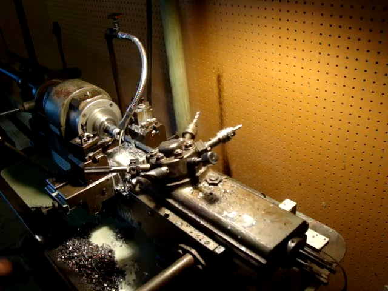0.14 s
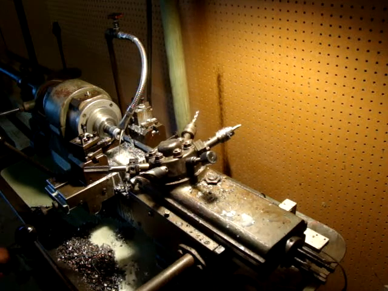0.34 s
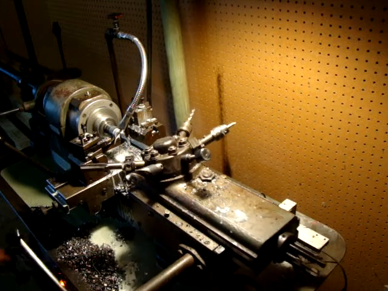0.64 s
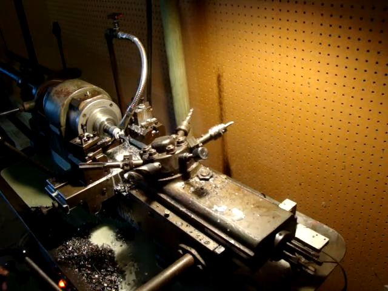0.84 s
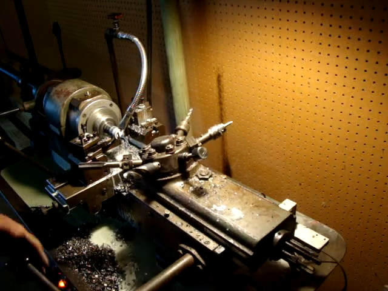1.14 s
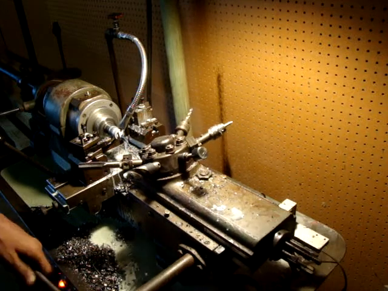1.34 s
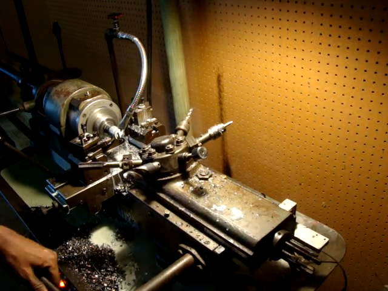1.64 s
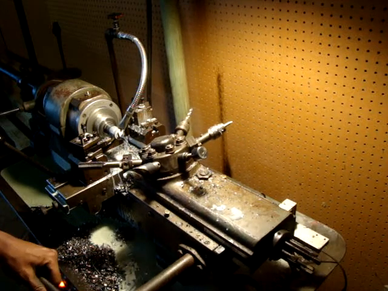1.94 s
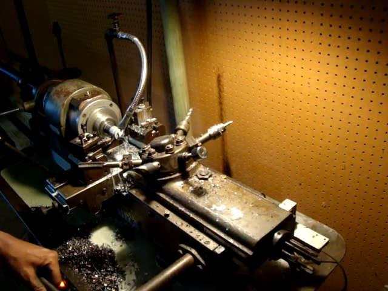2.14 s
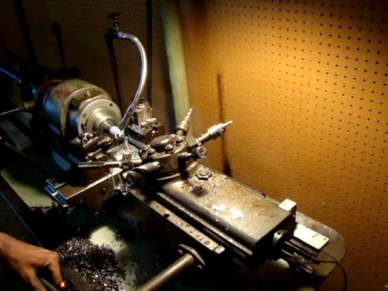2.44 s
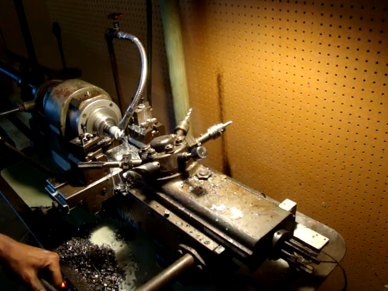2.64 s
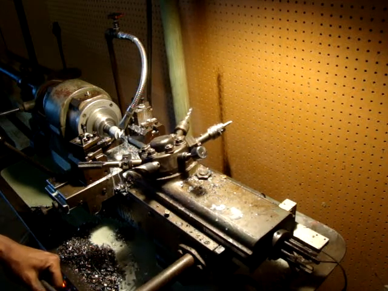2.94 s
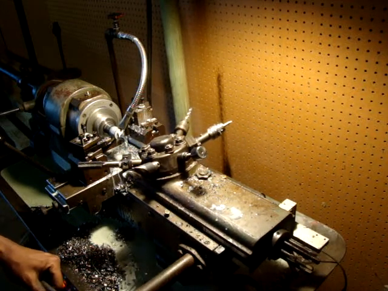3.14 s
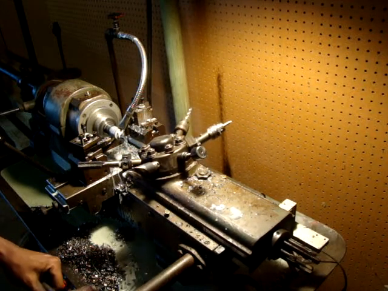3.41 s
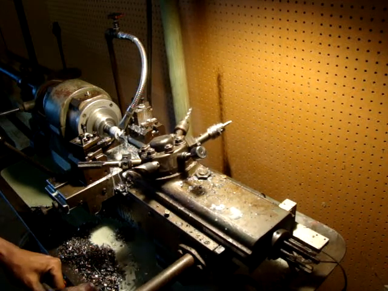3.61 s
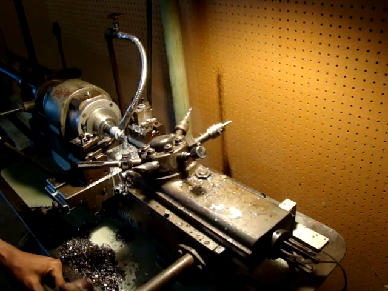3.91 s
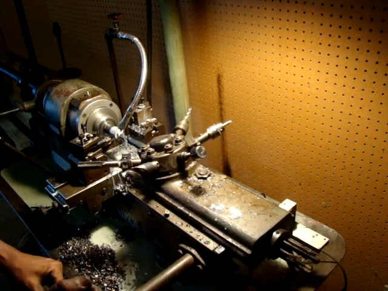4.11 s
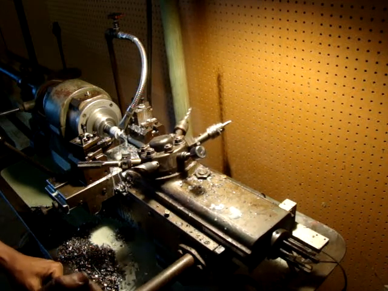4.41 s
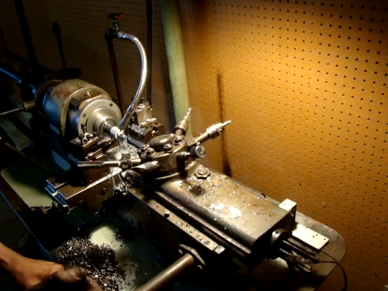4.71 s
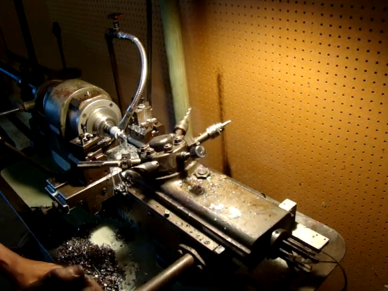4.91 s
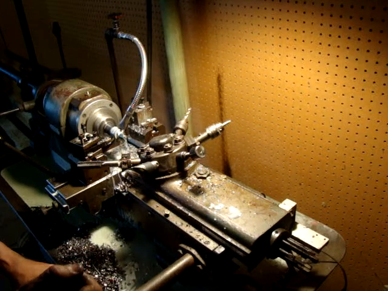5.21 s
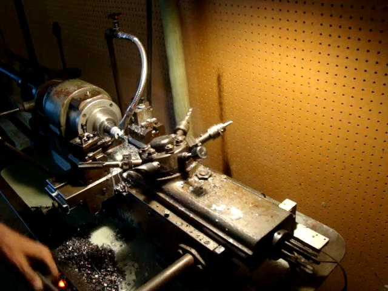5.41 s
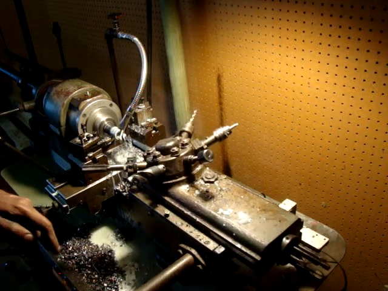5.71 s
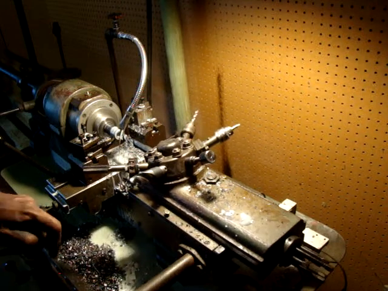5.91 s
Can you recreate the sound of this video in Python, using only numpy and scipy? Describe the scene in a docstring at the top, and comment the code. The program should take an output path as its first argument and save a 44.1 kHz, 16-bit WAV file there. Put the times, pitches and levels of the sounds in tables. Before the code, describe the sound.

A small turret lathe runs close by in a compact workshop, dull at the very top and the same on both sides. Motor hum, belt noise and swishing bearings continue throughout with faint uneven ticks; the fluttering gear whine near 570 Hz builds over the first 0.6 s. At about 0.1 s a lever clunks twice, rattling and ringing; at 0.26-0.33 s a pawl clack and heavier stop blows follow. The machine then idles until a tool begins rubbing around 1.6 s. It bites near 1.9 s: dense, gritty grinding and shearing, a low groan, bright sizzle, and the whine drops slightly in pitch but strengthens. Chips crackle sharply, busiest from 2.0 to 3.7 s. Surges dig in from 3.1 to 4.8 s, and a thin hiss slides by at 4.1-4.5 s. Around 5.4 s the tool withdraws with a short scrape, leaving the idling whine until 6 s.

```python
"""In a workshop, a small turret lathe runs: a fluttering gear whine, motor tones, belt noise and swishing bearings.
The turret slide is pulled back and indexes with a few steel clunks: rattling slide modes and ringing struck parts.
A tool is fed into the spinning stock: it rubs, bites and grinds, made of dense random fractures through resonances.
Chips crackle off in ringing bursts, one long chip hisses, and the load slows the whine until the tool withdraws."""
import sys
import numpy as np
from scipy import signal
from scipy.fft import rfft, irfft
from scipy.io import wavfile

SR = 44100
rng = np.random.default_rng(int(sys.argv[2]) if len(sys.argv) > 2 else 0)


def transcribe(u):
    """Save the signal u as a 16-bit wav file named by the first command-line argument.

    u: samples, shape (n,) or (channels, n), limited to [-1, 1]; the rate is SR.
    q: integer samples, one column per channel.
    """
    v = np.clip(np.atleast_2d(u).T, -1, 1)
    q = np.round(v * 32767).astype(np.int16)
    wavfile.write(sys.argv[1], SR, q)


N = 267246
TIME = np.arange(N) / SR
TEETH = 16  # meshes per spindle turn
GRAIN_DB = 3.4  # how unevenly the steel breaks


def from_db(db):
    """Decibels to gain."""
    return 10 ** (np.asarray(db) / 20)


def rms_one(x):
    """Scale to unit power."""
    return x / np.sqrt(np.mean(x ** 2) + 1e-20)


def in_time(rows):
    """Draw each column of a breakpoint curve at every sample."""
    times, *columns = np.transpose(rows)
    return [np.interp(TIME, times, column) for column in columns]


def drift(rate_hz):
    """Slow random motion with spread 1: noise through two equal poles, made at every 40th sample."""
    step = 40
    pole = np.exp(-2 * np.pi * rate_hz * step / SR)
    noise = rng.standard_normal(N // step + 2002)
    slow = signal.lfilter([1], [1, -2 * pole, pole * pole], noise)[2000:]  # settled part
    return np.interp(np.arange(N) / step, np.arange(len(slow)), rms_one(slow))


def colour(x, spectrum):
    """Give a steady excitation a spectrum, with falling skirts beyond its ends; rms 1."""
    hz, db = np.transpose(spectrum)
    log_hz = np.log(np.maximum(np.arange(N // 2 + 1) * SR / N, 1))
    below = np.maximum(np.log(hz[0]) - log_hz, 0)
    above = np.maximum(log_hz - np.log(hz[-1]), 0)
    gain_db = np.interp(log_hz, np.log(hz), db) - 20 * (below + above)
    return rms_one(irfft(rfft(x) * from_db(gain_db), N))


def resonate(x, hz, width_hz):
    """One two-pole resonance with gain 1 at its peak."""
    r = np.exp(-np.pi * width_hz / SR)
    zeros = np.array([1, 0, -1]) * (1 - r * r) / 2
    poles = [1, -2 * r * np.cos(2 * np.pi * hz / SR), r * r]
    return signal.lfilter(zeros, poles, x + 1e-18)


def body(x, modes):
    """A solid's resonances in parallel, with alternating signs; rms 1."""
    total = 0
    for k, (hz, width_hz, db) in enumerate(modes):
        total = total + (-1) ** k * from_db(db) * resonate(x, hz, width_hz)
    return rms_one(total)


def fractures(per_s, spread_db):
    """Tiny breaks at random moments, of uneven size and either sign; rms 1."""
    sizes = from_db(spread_db * np.minimum(rng.exponential(1, N), 4))
    breaks = rng.random(N) < per_s / SR
    return rms_one(sizes * rng.choice([-1, 1], N) * breaks)


def sine(hz):
    """A tone of rms 1 that follows a pitch curve from a random phase."""
    return np.sqrt(2) * np.sin(2 * np.pi * (np.cumsum(hz) / SR + rng.random()))


def swells(rows, rise_s, fall_s):
    """Attack, hold and release for each (time [s], length [s], level [dB]), summed as gain."""
    total = 0
    for start, length, db in rows:
        attack = 1 - np.exp(-np.maximum(TIME - start, 0) / rise_s)
        release = np.exp(-np.maximum(TIME - start - length, 0) / fall_s)
        total = total + from_db(db) * attack * release
    return total


# overtones of the spindle under load: (multiple of a turn, level at full contact [dB])
LOAD_OVERTONES = [(15, -38.5), (17, -38), (22, -48), (24, -33.5)]
WHINE_FLUTTER = .34


def drive(spindle_hz, whine_db, load, flutter_rate=40, wander=0.0015, load_flutter=0.25):
    """Teeth mesh unevenly, so the whine flutters in level and phase; load brings out more spindle orders."""
    mesh = 2 * np.pi * np.cumsum(TEETH * spindle_hz * (1 + wander * drift(4.2))) / SR
    flutter = drift(flutter_rate) * np.sin(mesh) + drift(flutter_rate) * np.cos(mesh)
    whine = np.sqrt(2) * (np.sin(mesh) + WHINE_FLUTTER * flutter)
    strain = 0
    for order, db in LOAD_OVERTONES:
        tone = sine(order * spindle_hz * (1 + 0.0016 * drift(15.8)))
        strain = strain + from_db(db) * tone * (1 + load_flutter * drift(14))
    return from_db(whine_db) * whine + load * strain


# steady tones of motor and frame: (pitch [Hz], level [dB])
MOTOR_TONES = [(120, -62.5), (200, -51.5), (248, -48.5), (294, -45.5), (402, -51), (678, -51), (731, -42),
               (1346, -46), (2143, -46)]
# running noise of belt and bearings: (frequency [Hz], relative density [dB per Hz])
RUNNING_SPECTRUM = [(25, -33.5), (70, -16.5), (130, -14), (220, -6.5), (460, -3.5), (560, 4.5), (660, -1.5),
                    (800, 1), (1050, -5), (1800, -7.5), (2800, -10), (3700, -8.5), (5600, -17.5),
                    (10000, -24)]
# headstock resonances: (frequency [Hz], width [Hz], relative level [dB])
HEADSTOCK_MODES = [(581, 88, -8), (745, 31, -1), (2310, 77, -4.5), (3380, 84, -2), (3814, 120, -8)]
# swish with each lap of the belt and each turn of its pulley:
# (spindle turns per cycle, first peak [cycles], swing [dB])
BELT_CYCLES = [(6, .23, 3.5), (1.5, .33, 1.8)]
BELT_DB, BELT_FLICKER_DB, SWISH_FLICKER_DB = -30.0, 1.0, 1.8


def motor(turns, bearings_db, waver=0.31, smear_hz=3.02):
    """Wavering motor tones, belt noise, and bearings that swish through the headstock as the belt goes round."""
    hum = 0
    for hz, db in MOTOR_TONES:
        tone = sine(hz + smear_hz * drift(14.2))
        hum = hum + from_db(db) * tone * (1 + waver * drift(10.0))
    belt_gain = from_db(BELT_DB + BELT_FLICKER_DB * drift(20))
    belt = belt_gain * colour(rng.standard_normal(N), RUNNING_SPECTRUM)
    swish_db = bearings_db + SWISH_FLICKER_DB * drift(17)
    for turns_per_cycle, peak, swing_db in BELT_CYCLES:
        swish_db = swish_db + swing_db * np.cos(2 * np.pi * (turns / turns_per_cycle - peak))
    bearings = from_db(swish_db) * body(rng.standard_normal(N), HEADSTOCK_MODES)
    return hum + belt + bearings


# bright band shared by the ticks and the sizzle of the cut: (frequency [Hz], relative density [dB per Hz])
SIZZLE_SPECTRUM = [(5000, -19), (6600, 2.5), (7500, 3), (8800, 6.5), (10000, 0.5)]
TICK_DB, TICK_SPREAD_DB, TICK_S = -38, 3.0, .005  # mid strength, unevenness, time to peak
TICK_GAP_S, TICK_GAP_SPREAD = .068, .45


def ticking(count=130):
    """Soft bright noise ticks at uneven gaps, each with a strength of its own."""
    chance = rng.uniform(-1.2, 1, (count, 2))
    gaps = TICK_GAP_S * (1 + TICK_GAP_SPREAD * chance[:, 0])
    starts = np.cumsum(gaps) - 2 * TICK_GAP_S
    tick = np.searchsorted(starts, TIME) - 1
    age = (TIME - starts[tick]) / TICK_S
    strength = from_db(TICK_DB + 2 * TICK_SPREAD_DB * chance[tick, 1])
    pulse = age * np.exp(1 - age)
    return strength * pulse * colour(rng.standard_normal(N), SIZZLE_SPECTRUM)


# turret blows: (time [s], level [dB], rise [s], rattle [dB], rattle t60 [s], treble lift [dB], part struck)
BLOWS = [(.074, -20, 0.006, 0, 0.23, 9, "lever"), (.089, -15.5, 0.0027, -1, 0.54, 3, "lever"),
         (.258, -18.5, 0.0033, -4, 0.18, 14, "pawl"), (.294, -15, 0.005, 1, 0.21, 3.5, "stop"),
         (.308, -13, 0.0024, -1, 0.56, -13, "stop"), (.334, -19.5, 0.0021, -2.5, 0.57, 4.5, "stop")]
# body of the turret slide: (frequency [Hz], relative density [dB per Hz])
SLIDE_SPECTRUM = [(40, -34), (130, -5), (250, -10), (450, 3.5), (750, 7), (1200, 1), (2200, 0), (3200, -4),
                  (4500, -8), (6500, -14.5), (10000, -21.5)]
# how each struck part rings, by name: (pitch [Hz], relative level [dB], t60 [s])
STRUCK_PARTS = {"lever": [(134.8, -21, 1), (188.6, -19, 1), (844, -3.5, 0.33), (1004, -8, 0.32),
                (1610, -9, 0.18), (2250, -8, 0.12), (2880, -11, .2), (3290, -28, .2), (3700, -13, 0.17),
                (3960, -8, 0.11)], "pawl": [(736, -6, 0.11), (1280, 3.5, 0.14), (1410, -6, 0.1),
                (1380, 0, 0.054), (1525, 5.5, 0.14), (3450, -23, 0.11), (4430, -19, .08), (5470, 3, 0.034)],
                "stop": [(360, -11.5, 0.37), (615, -2.5, 0.13), (695, 0.5, 0.14), (774, -17, 0.29),
                (921, -7, 0.26), (990, -7, .28), (1920, -8, 0.13), (2260, -10, 0.27), (2456, -18, 0.17),
                (2884, 1, 0.079), (3810, -11.5, 0.17)]}


def turret(treble_hz=4200, modes_db=1.5):
    """Each blow rattles the dense modes of the slide and sets the struck part ringing."""
    out = np.zeros(N)
    age = TIME[:SR // 2]
    high_pass = signal.butter(1, treble_hz, "high", fs=SR, output="sos")
    for start, db, rise, rattle_db, t60, treble_db, part in BLOWS:
        rattle = colour(fractures(5000, 1.5), SLIDE_SPECTRUM)[:len(age)]
        treble = signal.sosfilt(high_pass, rattle)
        rattle = rattle + (from_db(treble_db) - 1) * treble
        rattle = rattle * from_db(rattle_db - 60 * age / t60)
        ring = 0
        for hz, level_db, ring_s in STRUCK_PARTS[part]:
            decay = from_db(modes_db + level_db - 60 * age / ring_s)
            ring = ring + decay * np.sin(2 * np.pi * (hz * age + rng.random()))
        at = round(start * SR)
        out[at:at + len(age)] += from_db(db) * (1 - np.exp(-age / rise)) * (rattle + ring)
    return out


# the tool rubs before it bites and as it is withdrawn: (time [s], length [s], level [dB])
RUB_SWELLS = [(1.575, 0.35, -26), (5.32, 0.084, -30)]
# tool and holder resonances: (frequency [Hz], width [Hz], relative level [dB])
TOOL_MODES = [(1040, 320, -2), (2333, 100, 4.5), (3170, 190, -4.5), (4720, 300, -3.5), (6150, 1150, -9)]
# the tool post groans near one pitch: (time [s], length [s], level [dB])
GROAN_SWELLS = [(1.92, 0.36, -35), (2.84, 0.031, -22), (3.03, 0.24, -31), (3.4, .55, -44)]
# how hard the tool is fed; its mean during the cut is taken off: (time [s], level [dB])
FEED_CURVE = [(1.95, -29.5), (2.55, -31.5), (3.95, -28), (4.55, -29.5), (4.9, -29.5), (5.22, -30),
              (5.4, -35)]
# the tool digs in by short surges: (time [s], level before SURGE_GAIN_DB [dB])
DIG_SURGES = [(3.1188, -23), (3.23, -21), (3.5269, -19.5), (3.6531, -20.5), (3.7783, -18), (3.9329, -20.5),
              (4.045, -18), (4.2293, -20), (4.3355, -25.5), (4.6458, -20), (4.707, -21), (4.7735, -27)]
# low spectrum of the cut: (frequency [Hz], relative density [dB per Hz])
RUMBLE_SPECTRUM = [(100, -31), (230, -8.5), (295, 4.5), (380, 3.5), (470, -1.5), (550, -13), (655, -4),
                   (780, 3.5), (1300, -4.5)]
# stock and tool post ringing under the cut: (frequency [Hz], width [Hz], relative level [dB])
GRIND_MODES = [(695, 116, -3.5), (936, 47, 1), (1063, 34, 6), (1172, 95, -0.5), (1432, 49, 3.5),
               (1521, 56, 2), (1700, 223, -2), (1970, 81, -0.5), (2250, 196, -5), (2960, 160, -8.5),
               (3280, 410, -11)]
# high spectrum of the cut: (frequency [Hz], relative density [dB per Hz])
SHEAR_SPECTRUM = [(1500, -23.5), (2600, 0), (4200, 6.5), (5500, 5.5), (6600, 4), (7600, -2), (10000, -40)]
SURGE_S, SURGE_GAIN_DB = .04, -5
GRIND_DB, GRIND_FOLLOWS = -28.5, 1.46  # at mean feed; dB per dB of feed
SHEAR_DB, SHEAR_FOLLOWS = -30.5, 0.64  # likewise
SIZZLE_DB, SIZZLE_FADE_DB_PER_S = -35, 1.46  # level at the first bite, then fading
JUDDER_DB, SIZZLE_FLICKER_DB = 1.1, 3.0


def cutting(spindle_hz, engaged, runout_db=0.83, groan_hz=290, groan_width_hz=16):
    """Steel shears off in dense small fractures, harder with more feed, in surges, and a little once each turn."""
    rub_gain = swells(RUB_SWELLS, rise_s=0.07, fall_s=0.031) * from_db(2 * drift(24))
    rub = rub_gain * body(fractures(9000, GRAIN_DB), TOOL_MODES)

    rumble = from_db(-34) * colour(fractures(2500, GRAIN_DB), RUMBLE_SPECTRUM)
    groan_tone = rms_one(resonate(fractures(2500, GRAIN_DB), groan_hz, groan_width_hz))
    groan = swells(GROAN_SWELLS, rise_s=0.045, fall_s=0.033) * groan_tone

    feed_db, = in_time(FEED_CURVE)
    feed_db = feed_db - np.mean(feed_db[engaged > .5])
    surge_rows = [(start, SURGE_S, db + SURGE_GAIN_DB) for start, db in DIG_SURGES]
    surges = swells(surge_rows, rise_s=.007, fall_s=.01)
    grind_gain = np.hypot(from_db(GRIND_DB + GRIND_FOLLOWS * feed_db), surges)  # powers add
    grind = grind_gain * body(fractures(3000, GRAIN_DB), GRIND_MODES)
    shear_gain = from_db(SHEAR_DB + SHEAR_FOLLOWS * feed_db)
    shear = shear_gain * colour(fractures(7000, GRAIN_DB), SHEAR_SPECTRUM)
    bite = from_db(runout_db * sine(spindle_hz) + JUDDER_DB * drift(14.4))

    sizzle_db = SIZZLE_DB - SIZZLE_FADE_DB_PER_S * (TIME - LOAD_CURVE[0][0])
    sizzle_gain = from_db(sizzle_db + SIZZLE_FLICKER_DB * drift(46))
    sizzle = sizzle_gain * colour(fractures(1800, GRAIN_DB), SIZZLE_SPECTRUM)
    return rub + engaged * (rumble + groan + bite * (grind + shear) + sizzle)


SHOP_T60_S = 0.12


def workshop(x, wet_db=-3):
    """Dense reflections from bench and walls follow the direct sound as decaying noise."""
    age = TIME[:SR // 2]
    tail = rng.standard_normal(len(age)) * from_db(-60 * age / SHOP_T60_S) * (age > .004)
    reflections = signal.fftconvolve(x, tail / np.linalg.norm(tail))[:N]
    wet = from_db(wet_db)
    return (x + wet * reflections) / np.hypot(1, wet)


# chips snap off and skitter: (time [s], level before trim_db [dB], length [s], pitch [Hz])
CHIP_BURSTS = [(2.024, -28, 0.07, 7500), (2.105, -22.5, 0.016, 7750), (2.186, -24, 0.014, 7000),
               (2.207, -21.5, 0.013, 8900), (2.226, -25, 0.008, 6600), (2.237, -23.5, 0.027, 5460),
               (2.418, -21, 0.0078, 9200), (2.449, -28, 0.0043, 8800), (2.464, -16.5, 0.011, 7000),
               (2.678, -21, 0.023, 8300), (2.705, -22.5, 0.017, 7450), (2.785, -24.5, 0.044, 9100),
               (2.816, -24.5, 0.022, 6500), (3.059, -25.5, 0.028, 7600), (3.199, -19.5, 0.019, 6600),
               (3.296, -21.5, 0.0093, 6800), (3.348, -25, 0.0085, 6250), (3.64, -26, .01, 6200),
               (3.664, -22, 0.0071, 4000), (3.687, -17.5, 0.0073, 6000), (3.703, -26, 0.011, 6400),
               (4.057, -30, .012, 3600), (4.64, -26, .01, 3300), (4.696, -22.5, 0.021, 4230),
               (4.919, -22, 0.0096, 3600)]


def chips(width_hz=1400, fade_s=0.0049, rise_s=0.00073, crack_db=-6, trim_db=-5.5):
    """Each chip tears away in a burst of cracks that ring at its own pitch."""
    out, cracks = np.zeros(N), fractures(2200, GRAIN_DB)
    age = TIME[:SR // 2]
    for start, db, length, hz in CHIP_BURSTS:
        at = round(start * SR)
        span = slice(at, at + len(age))
        burst = (1 - np.exp(-age / rise_s)) * np.exp(-np.maximum(age - length, 0) / fade_s)
        crack = rms_one(resonate(cracks[span], hz, 3 * width_hz))
        ring = rms_one(resonate(crack, hz, width_hz))
        out[span] += from_db(db + trim_db) * burst * (ring + from_db(crack_db) * crack)
    return out


# a long chip slides over the tool with a thin hiss: (time [s], length [s], level [dB])
CURL_SWELLS = [(4.13, 0.34, -32)]


def curl(hz=5450, width_hz=900):
    """Fine friction of the sliding chip, passed twice through one narrow band."""
    band = resonate(fractures(7200, 1.8), hz, width_hz)
    hiss = rms_one(resonate(band, hz, width_hz))
    return swells(CURL_SWELLS, rise_s=0.076, fall_s=0.054) * hiss


# the cut weighs on the drive: (time [s], load [0-1])
LOAD_CURVE = [(1.87, 0), (1.96, .68), (3, .95), (5.2, 0.98), (5.35, 0.91), (5.46, 0.07)]
FULL_CONTACT_LOAD = 0.73  # from this load on the whole edge is in the steel
IDLE_HZ, SAG_HZ = 570.8, 8.7  # whine pitch when idle, and its drop at load 1
WHINE_DB, WHINE_CUT_DB = -31.5, 2  # the whine when idle, and its gain during the cut
SWISH_DB = -37  # mean level of the bearings
WHINE_START_DB, SWISH_START_DB, BUILD_S = -20, -7, 0.61  # both start fainter and build up


def scene():
    """Lathe, turret and cut, the same in both channels; load slows the spindle and lifts its whine."""
    load, = in_time(LOAD_CURVE)
    engaged = np.clip(load / FULL_CONTACT_LOAD, 0, 1)
    spindle_hz = (IDLE_HZ - SAG_HZ * load) / TEETH
    turns = np.cumsum(spindle_hz) / SR
    starting = np.maximum(1 - TIME / BUILD_S, 0)
    whine_db = WHINE_DB + WHINE_CUT_DB * engaged + WHINE_START_DB * starting
    bearings_db = SWISH_DB + SWISH_START_DB * starting
    machine = drive(spindle_hz, whine_db, engaged) + motor(turns, bearings_db) + ticking() + turret()
    steel = workshop(cutting(spindle_hz, engaged), wet_db=-9.0) + chips() + curl()
    return np.tile(machine + steel, (2, 1))


PEAK_CEILING, CUTOFF_HZ = .8, 10150


def record(dry):
    """The highest peaks are rounded towards a ceiling and the top is cut steeply."""
    rounded = dry / (1 + (dry / PEAK_CEILING) ** 4) ** (1 / 4)
    low_pass = signal.ellip(12, .2, 80, CUTOFF_HZ, fs=SR, output="sos")
    return signal.sosfilt(low_pass, rounded)


dry = scene()
out = record(dry)
transcribe(out)
```